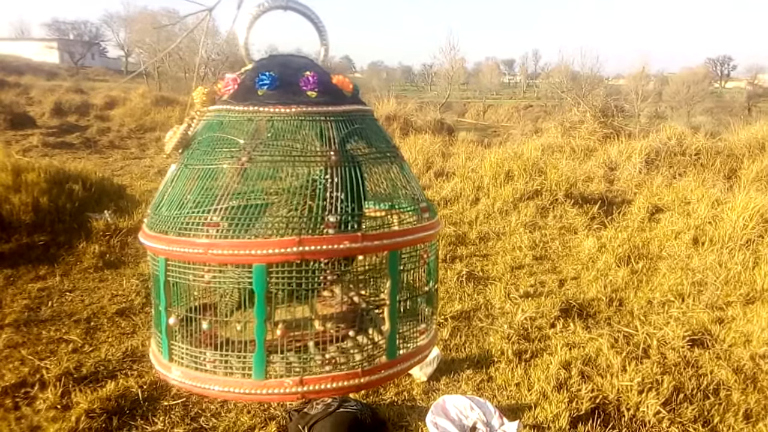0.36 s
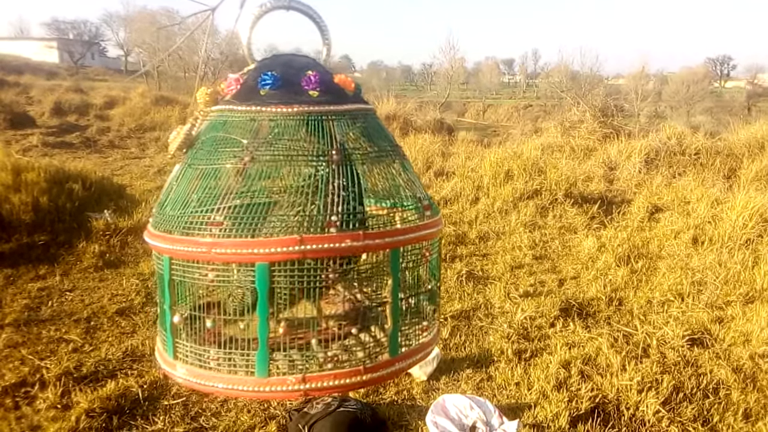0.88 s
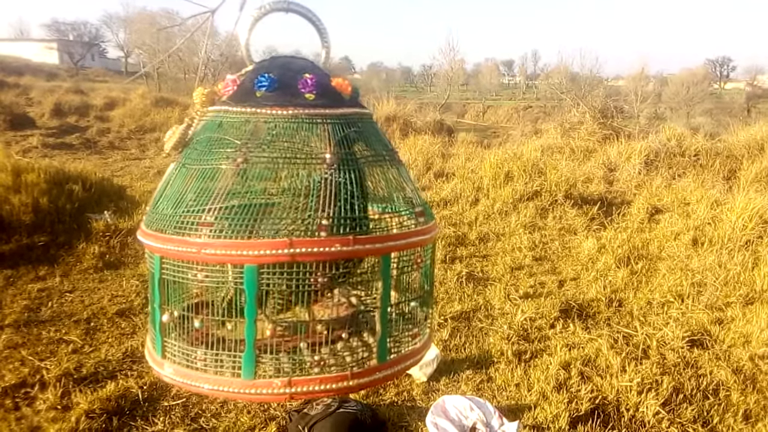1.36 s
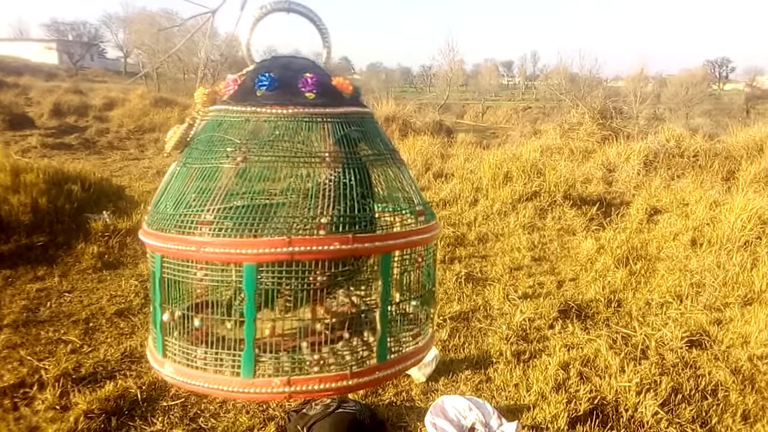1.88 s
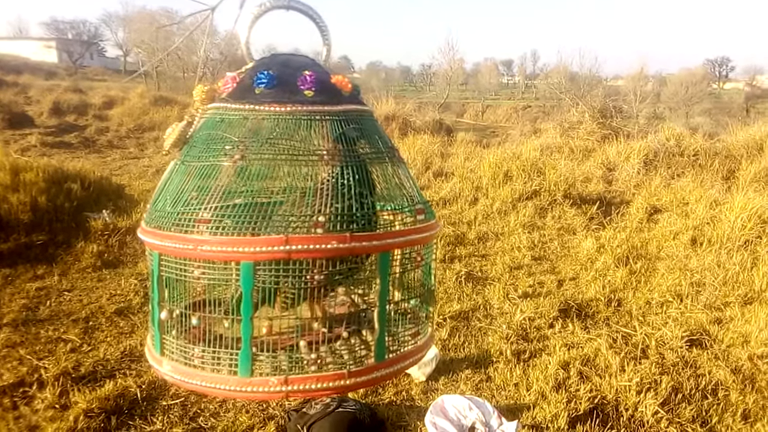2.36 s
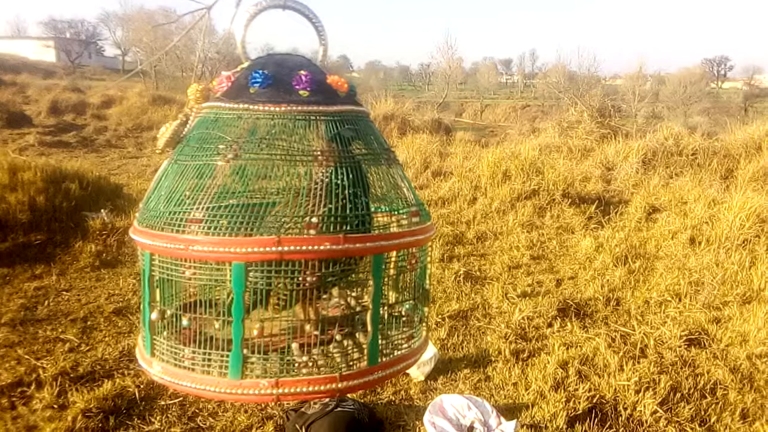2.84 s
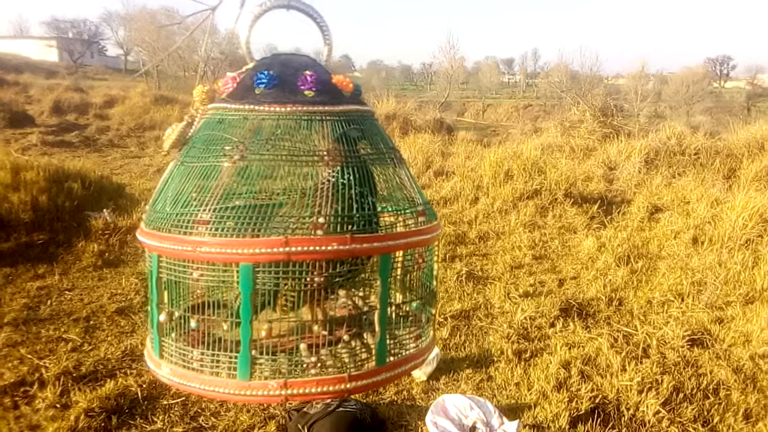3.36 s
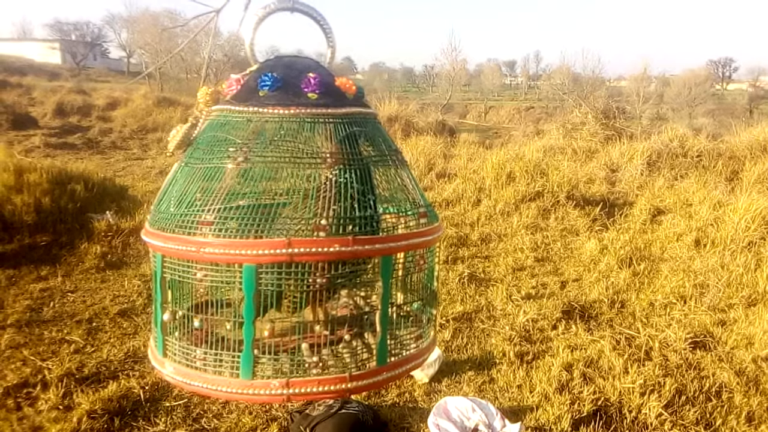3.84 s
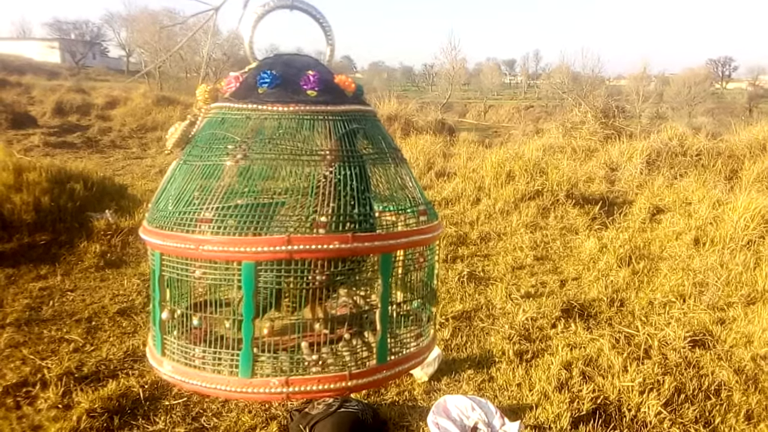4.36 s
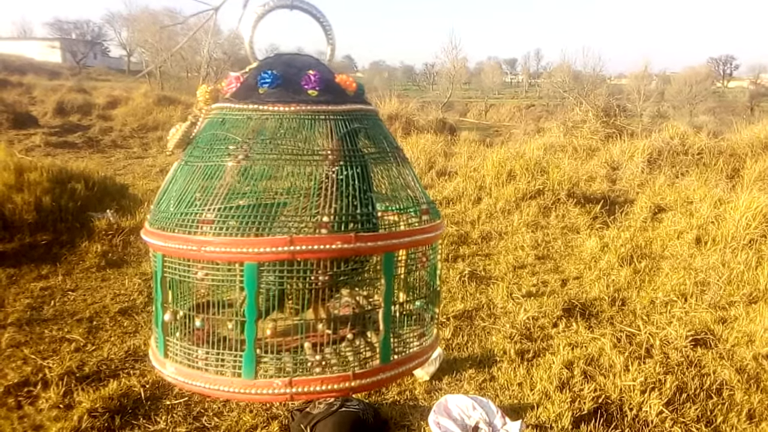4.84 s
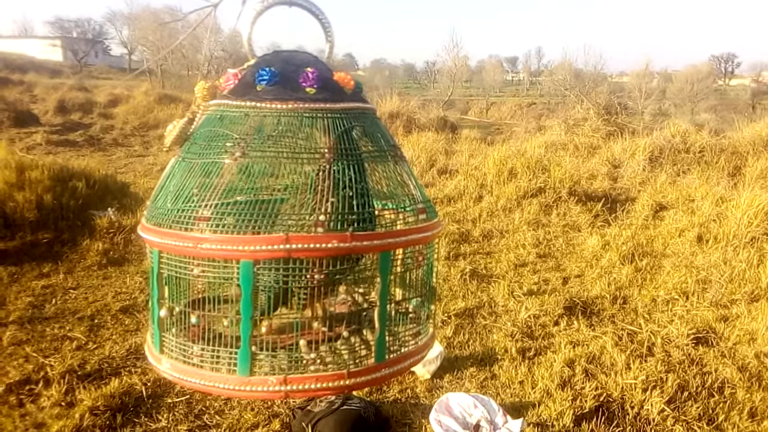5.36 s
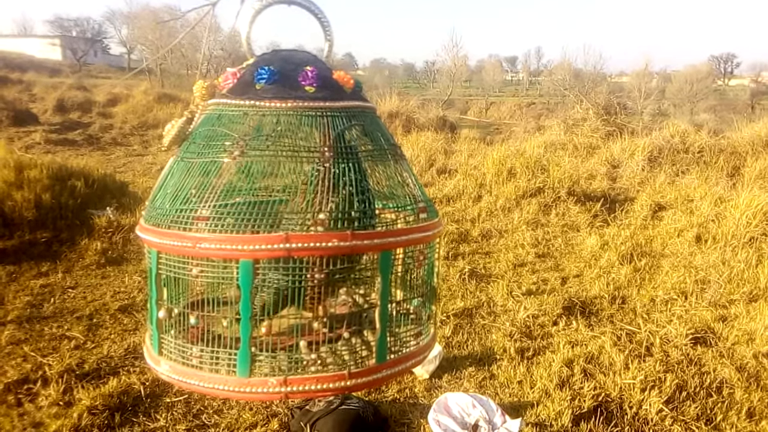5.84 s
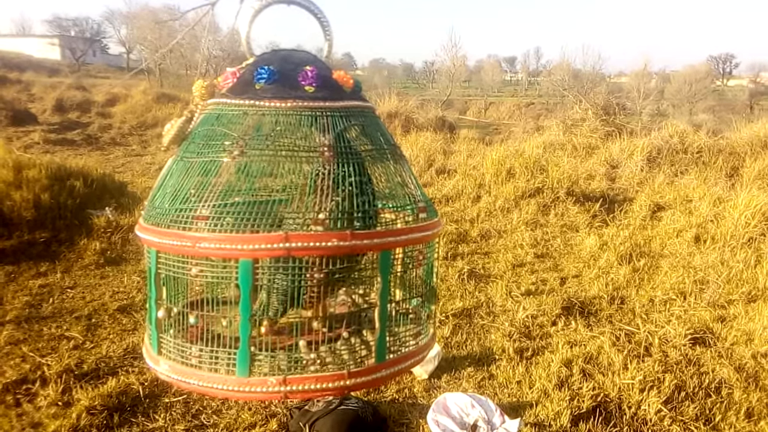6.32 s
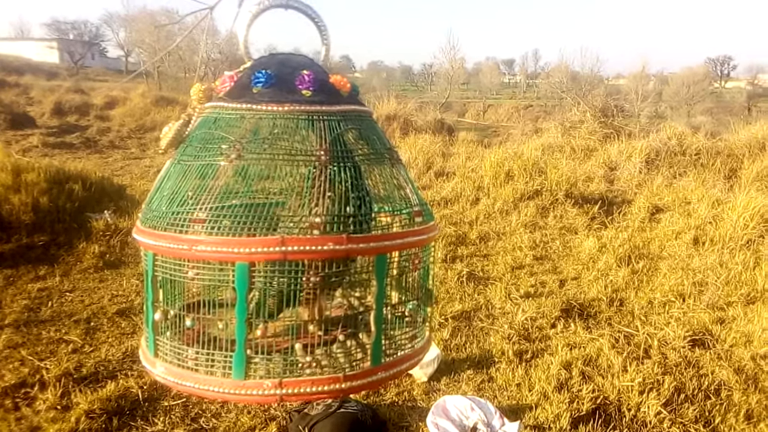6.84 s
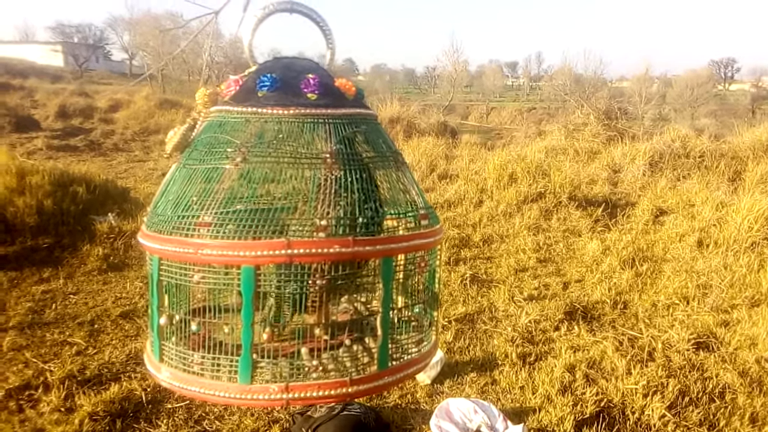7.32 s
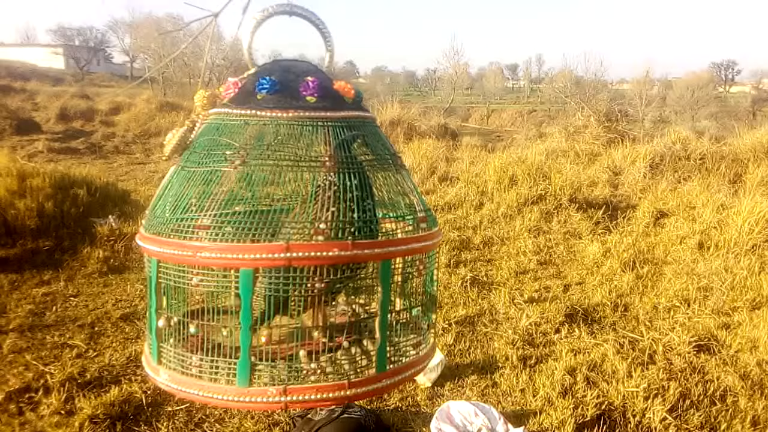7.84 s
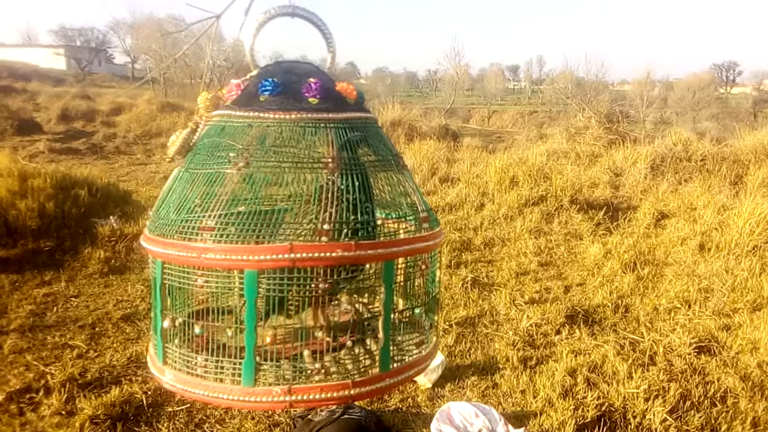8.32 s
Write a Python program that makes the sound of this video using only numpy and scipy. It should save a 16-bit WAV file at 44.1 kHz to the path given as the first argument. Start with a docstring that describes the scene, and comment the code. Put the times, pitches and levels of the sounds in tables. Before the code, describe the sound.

Open dry farmland, very quiet, with low gusty wind, faint flickering hiss and sparse far birds. Close to a phone microphone, a caged game bird makes one quick cluck with a plunging whistle, pauses long, then gives a piercing whistled chip and four raspy, metallic buzzes in quick succession, two of them cracking briefly into clear whistle. A light scattered echo fades behind, leaving the field.

```python
"""A caged partridge-like bird calls a metre from a phone in open farmland: buzzing notes, whistles, clucks and pops.
The buzz is one tone that flips between a low and a high pitch, mostly 200 to 300 times a second, coloured by the
windpipe. Whistles are smooth tones, clucks are low pulses with breath, and pops are short damped rings.
Tree lines and walls return thin echoes, made of fading noise. Far songbirds, a dove and hoarse crow-like sounds
are gliding tones; wind rumble and a flickering hiss are filtered noise."""
import sys
import numpy as np
from scipy import signal
from scipy.fft import rfft, irfft
from scipy.io import wavfile
from scipy.ndimage import uniform_filter1d, minimum_filter1d

SR = 44100
rng = np.random.default_rng(int(sys.argv[2]) if len(sys.argv) > 2 else 0)


def makeup_ratio(level_db):
    """Linear amplitude ratio for a level in decibels (20 dB per factor of ten)."""
    decades = np.asarray(level_db, float) / 20
    return 10 ** decades


def put_to_file(sound):
    """Save the sound as 16-bit audio at rate SR, in the file named by the first command-line argument."""
    columns = np.atleast_2d(sound).T  # one column per channel
    safe = np.clip(columns, -1, 1)
    whole_steps = np.round(safe * 32767)
    wavfile.write(sys.argv[1], SR, whole_steps.astype(np.int16))


N = 372644  # length in samples
T = np.arange(N) / SR  # time in seconds


def colour(x, points):
    """Filter a sound with the gain drawn by (Hz, dB) points, without ringing ahead of time."""
    hz, db = np.transpose(points)
    size = 4096
    bins = np.fft.rfftfreq(size, 1 / SR)
    log_gain = np.log(makeup_ratio(np.interp(np.log(bins + 1), np.log(hz), db)))
    # folding the cepstrum forward gives a minimum-phase filter
    cepstrum = irfft(log_gain)
    cepstrum = np.r_[cepstrum[0], 2 * cepstrum[1:size // 2], np.zeros(size // 2)]
    return signal.fftconvolve(x, irfft(np.exp(rfft(cepstrum))))[:len(x)]


def unit(x):
    """Scale to rms 1."""
    return x / np.sqrt(np.mean(x ** 2))


def coloured_noise(points):
    """Noise of rms 1 with the given tone colour."""
    return unit(colour(rng.standard_normal(N), points))


def walk(rate, count=N):
    """Smooth random wander, spread near 1, about rate new values a second."""
    k = max(int(SR / rate), 1)
    smooth = uniform_filter1d(uniform_filter1d(rng.standard_normal(count), k), k)
    return np.sqrt(1.8 * k) * smooth


def tone(hz, multiples, db):
    """Partials of one oscillator whose pitch moves every sample."""
    phase = 2 * np.pi * np.cumsum(hz) / SR
    return np.sqrt(2) * sum(makeup_ratio(d) * np.sin(m * phase) for m, d in zip(multiples, db))


def clock(start, length):
    """Sample range of a note and the seconds since its start."""
    span = slice(int(start * SR), int((start + length) * SR))
    return span, T[span] - start


EDGE_DB = -29.5  # level at the very edges of a note, against its middle


def edges(t, length, attack, release):
    """Attack, hold and release of a note in dB."""
    fade_in = np.clip(1 - t / attack, 0, 1)
    fade_out = np.clip(1 - (length - t) / release, 0, 1) ** 2
    return EDGE_DB * (fade_in + fade_out)


# The buzzing notes. Each row: start in seconds, length in seconds, attack in seconds, level in dB before colouring.
BUZZ_NOTES = [(6.267, .18, 0.0018, -13), (6.604, .217, 0.019, -12.5), (7.113, .11, 0.0058, -13),
              (7.276, .196, .01, -13)]
# How the membranes flutter. Each row: time in seconds, flips per second, unevenness from 0 to 1.
FLUTTER_PATH = [(6.27, 281, .05), (6.37, 285, .07), (6.43, 236, .3), (6.62, 258, .4), (6.65, 265, .1),
                (6.71, 305, .2), (6.745, 195, .5), (6.8, 290, .2), (7.12, 270, .3), (7.165, 260, .08),
                (7.21, 280, .4), (7.285, 255, .4), (7.335, 260, .1), (7.375, 284, .07), (7.43, 265, .1),
                (7.46, 236, .4)]
# Loudness of the buzz's first three partials, in dB before colouring.
BUZZ_PARTIALS_DB = [-0.5, -7.5, -22]
# Windpipe and microphone with the beak open. Each row: frequency in Hz, gain in dB.
OPEN_BEAK = [(700, -64), (1500, -16), (2350, -22), (2750, 4), (3200, 2), (3700, -1), (4700, 2.5), (5400, 1),
             (5900, -8), (6600, 3), (7600, -15), (9000, -18.5), (10500, -26), (11800, -21.5),
             (13500, -28.5), (15200, -27)]


def buzz():
    """The membranes flip between two pitches and falter at each flip; breath leaks through the same windpipe."""
    taut_low_hz, taut_high_hz = 2820, 5450  # the two pitches in mid note
    slack_low_hz, slack_high_hz = 2545, 4446  # and where the note begins or dies
    slack_s, release_s = 0.027, 0.02256  # time to tighten, time to fade
    sag_db_s = -10.5  # air runs out
    breath_db, slack_breath_db = -14, 6  # against the tone; more air leaks while slack
    squareness, dip = 1.8, .6  # how abrupt each flip is, how deeply it falters
    waver, shimmer_db = .016, 1.0  # random pitch share, random level
    mute_s = .004  # the buzz sinks over this time as a whistle breaks in
    tighten, tighten_s = .09, .02  # share the low pitch climbs toward a break; it comes down after it
    voiced, breath = np.zeros(N), np.zeros(N)
    at, rate, roughness = np.transpose(FLUTTER_PATH)
    for start, length, attack, db in BUZZ_NOTES:
        span, t = clock(start, length)
        count = len(t)
        slack = np.exp(-t / slack_s) + np.exp((t - length + release_s / 2) / slack_s)
        slack = np.minimum(slack, 1)
        low = taut_low_hz + (slack_low_hz - taut_low_hz) * slack
        high = taut_high_hz + (slack_high_hz - taut_high_hz) * slack
        level = db + sag_db_s * t + edges(t, length, attack, release_s)
        for break_start, lasts, _, _ in WHISTLE_BREAKS:
            # seconds inside the break, negative outside it
            inside = np.minimum(T[span] - break_start, break_start + lasts - T[span])
            level += EDGE_DB * np.clip(inside / mute_s, 0, 1)
            low = low * (1 + tighten * np.exp(np.minimum(inside, 0) / tighten_s))
        flips = np.interp(T[span], at, rate)
        uneven = np.interp(T[span], at, roughness)
        turn = 2 * np.pi * np.cumsum(flips * (1 + uneven * walk(350, count))) / SR
        # -1 is the low pitch, +1 the high one
        side = np.tanh(squareness * np.sin(turn)) / np.tanh(squareness)
        hz = low + (high - low) * (1 + side) / 2
        hz = hz * (1 + waver * walk(624, count))
        # the wider the jump, the deeper the falter
        falter = 1 - dip * np.log2(high / low) * (1 - side ** 2)
        loudness = makeup_ratio(level + shimmer_db * walk(500, count))
        voiced[span] = tone(hz, [1, 2, 3], BUZZ_PARTIALS_DB) * falter * loudness
        breath[span] = makeup_ratio(level + breath_db + slack_breath_db * slack) * (1 - side / 2)
    return colour(voiced, OPEN_BEAK) + breath * coloured_noise(OPEN_BEAK)


# Free whistles. Each row: start in seconds, length in seconds, top pitch in Hz, last pitch in Hz
# (both before the slide and arch), level in dB.
FREE_WHISTLES = [(.6935, .0265, 5960, 3900, -10.5), (5.746, .0185, 3620, 1650, -12),
                 (5.7878, .04, 6630, 2500, -8)]
# A buzz breaks into a steady whistle with a strong undertone.
# Each row: start in seconds, length in seconds, top pitch in Hz, level in dB.
WHISTLE_BREAKS = [(6.765, .028, 6170, -13), (7.35, 0.023, 6310, -16.5)]
# Overtones in dB: the octave of the tone, then the third partial of the undertone (against the undertone).
WHISTLE_PARTIALS_DB = [-22.5, -21.5]
# The windpipe has notches that the tone slides through. Each row: pitch in Hz, gain in dB.
WHISTLE_GAIN = [(2600, -1), (3500, -13), (4600, -1), (5300, -4), (5700, 0), (5950, -16), (6300, -4),
                (6500, 0)]


def whistle_note(hz, level, under_db, breath):
    """A clean tone, with an undertone that makes every other cycle stronger, over a little breath."""
    breath_db, shimmer_db = -28, .7
    octave_db, third_db = WHISTLE_PARTIALS_DB
    main = tone(hz, [1], [np.interp(hz, *np.transpose(WHISTLE_GAIN))])
    # the octave fades when the membrane slackens
    octave = tone(hz, [2], [octave_db]) * (hz / hz.max()) ** 8
    undertone = makeup_ratio(under_db) * tone(hz, [.5, 3 / 2], [0, third_db])
    loudness = makeup_ratio(level + shimmer_db * walk(400, len(hz)))
    return (main + octave + undertone + makeup_ratio(breath_db) * breath) * loudness


def whistle():
    """A steady membrane sings: free whistles slide up, arch and plunge, while breaks in a buzz only arch."""
    scoop, scoop_s, bow = .3, .0017, .035  # pitch shares: slide up into a free whistle, arch over its length
    drop_before_s, drop_hz_s = .0045, 4.2  # plunge: centre before the end; the deeper, the quicker (Hz x s)
    attack_drops, release_drops = 1.5, 5  # edges last this many plunge times
    sag_db_s = -150  # air runs out
    out, breath = np.zeros(N), coloured_noise(OPEN_BEAK)
    for start, length, top, last, db in FREE_WHISTLES:
        span, t = clock(start, length)
        drop_s = drop_hz_s / (top - last)
        arch = bow * (2 * t / length - 1) ** 2
        hz = top * (1 - arch - scoop * np.exp(-t / scoop_s))
        hz -= (top - last) / (1 + np.exp((length - drop_before_s - t) / drop_s))
        level = db + sag_db_s * t + edges(t, length, attack_drops * drop_s, release_drops * drop_s)
        out[span] = whistle_note(hz, level, -32, breath[span])
    for start, length, top, db in WHISTLE_BREAKS:
        span, t = clock(start, length)
        hz = top * (1 - bow * (2 * t / length - 1) ** 2)
        level = db + edges(t, length, .004, .002)
        out[span] = whistle_note(hz, level, -11, breath[span])
    return out


# Clucks that open a note and rise. Each row: peak time in seconds, pulse rate in Hz at the peak, voice level in dB,
# breath level in dB, fade in seconds; levels are before the falling partials and the colouring of the voice.
OPENING_CLUCKS = [(.679, 1125, -24.5, -24.5, 0.021), (.696, 1312, -19.5, -23.5, 0.007),
                  (.724, 1460, -36.5, -37.5, 0.02), (5.756, 1774, -20, -27.5, .028),
                  (5.79, 1580, -42, -24, 0.0034), (6.605, 1173, -34.5, -26.5, 0.076),
                  (7.104, 1177, -24, -17, 0.039), (7.282, 1210, -17, -20.5, 0.0071)]
# Clucks that close a note and sink. Each row: the same columns.
CLOSING_CLUCKS = [(.773, 850, -22, -33, 0.022), (5.767, 1570, -15.5, -30.5, .022),
                  (5.827, 1550, -27.5, -28, 0.014), (6.432, 1238, -45, -32, 0.017),
                  (6.812, 1135, -29.5, -24.5, .016), (7.208, 1182, -29, -30.5, 0.0091),
                  (7.466, 1075, -29, -30.5, 0.013)]
# Windpipe and microphone with the beak nearly shut. Each row: frequency in Hz, gain in dB.
SHUT_BEAK = [(450, -57.5), (800, -14.5), (1500, -4.5), (2100, -7.5), (2900, 3.5), (3800, -9.5), (4700, 2),
             (5800, -12), (6800, -9), (8000, -21.5), (11000, -25), (13000, -34.5), (15200, -27.5)]


def cluck():
    """Low pulses and breath ring the longer, nearly closed windpipe."""
    # rise in s, glide in Hz per s, roundness of the peak
    opening_shape, closing_shape = (.005, 12000, 1.0), (.01, -8000, 2.0)
    breath_lingers = 1.8  # fade of the breath against that of the voice
    jitter, fall_db = .025, -1.2  # random pitch share, level change per partial
    voiced, breath = np.zeros(N), np.zeros(N)
    orders = np.arange(1, 11)

    def under_peak(t, rise, fall, roundness):
        """Level against the peak: rise and fall are the times to 40 dB under it."""
        return -40 * np.where(t < 0, -t / rise, t / fall) ** roundness

    for table, shape in ((OPENING_CLUCKS, opening_shape), (CLOSING_CLUCKS, closing_shape)):
        rise, glide, roundness = shape
        for peak, rate_hz, db, breath_db, fade in table:
            breath_fade = breath_lingers * fade
            span, t = clock(peak - rise, rise + breath_fade)
            t = t - rise  # zero at the peak
            hz = (rate_hz + glide * t) * (1 + jitter * walk(400, len(t)))
            voice_level = makeup_ratio(db + under_peak(t, rise, fade, roundness))
            voiced[span] += tone(hz, orders, fall_db * orders) * voice_level
            breath[span] += makeup_ratio(breath_db + under_peak(t, rise, breath_fade, roundness))
    return colour(voiced, SHUT_BEAK) + breath * coloured_noise(SHUT_BEAK)


# Pops as the windpipe snaps open. Each row: start in seconds, pitch in Hz, starting level of the decay in dB,
# time in seconds to die by 60 dB.
POP_RINGS = [(.6775, 1240, -11, .02), (.6935, 1510, -23, .024), (.7241, 1393, -34.5, .032),
             (6.2652, 5300, -7, .045), (6.603, 1260, -27, .013), (6.79, 2930, -9, .0077),
             (7.102, 1156, -19, .024), (7.281, 1275, -28.5, .04), (7.371, 4370, -5, .008)]


def pops():
    """Each pop is one short damped ring."""
    out, t = np.zeros(N), T[:int(.06 * SR)]
    for start, hz, db, t60 in POP_RINGS:
        k = int(start * SR)
        onset = np.minimum(t / .0008, 1)
        out[k:k + len(t)] += makeup_ratio(db - 60 * t / t60) * np.sin(2 * np.pi * hz * t) * onset
    return out


# A dove. Each row: start in seconds, length in seconds, level in dB.
DOVE_NOTES = [(.951, 0.082, -60), (1.536, 0.084, -54.5), (1.914, 0.075, -53), (2.034, 0.052, -65)]
# The dove's glide: start, middle and end pitch in Hz.
DOVE_GLIDE = (650, 715, 710)
# A sparrow's chirps. Each row: start in seconds, level in dB.
SPARROW_CHIRPS = [(2.17, -61), (3.474, -60), (4.456, -62)]
# The arch and the level tail of one chirp. Each row: delay after the start in seconds, length in seconds,
# start, middle and end pitch in Hz, level against the chirp in dB.
CHIRP_PARTS = [(0, .048, 4210, 5350, 3900, -0.59), (0.047, 0.052, 4190, 4050, 4390, -0.21)]
# Clear songbird notes. Each row: start in seconds, length in seconds, start pitch in Hz, end pitch in Hz, level in dB.
SONG_NOTES = [(0, .036, 2950, 2200, -61), (0, 0.03, 3138, 3260, -58.5), (.02, 0.036, 4750, 3850, -64.5),
              (.035, 0.067, 1900, 1650, -66.5), (.065, 0.027, 4050, 4050, -63.5),
              (.08, 0.05, 3320, 2750, -70.5), (.457, .064, 3060, 3000, -72), (1.65, .12, 2830, 2740, -71),
              (2.18, .07, 3030, 3420, -63.5), (2.26, 0.13, 2690, 2780, -66),
              (2.418, 0.077, 3080, 3280, -61.5), (3.0, .07, 2400, 2240, -68), (3.1, 0.077, 3020, 2930, -64),
              (3.26, .03, 3780, 3680, -71), (3.76, .05, 2950, 3130, -64.5), (4.34, .07, 3380, 2980, -71.5),
              (4.42, .06, 2640, 2500, -73), (4.76, 0.037, 2920, 3170, -62), (4.8, 0.062, 4420, 4350, -67),
              (4.87, .07, 4000, 2850, -70), (5.15, 0.11, 3650, 3130, -69.5), (5.5, .12, 3700, 2910, -66),
              (6.04, 0.059, 4400, 4350, -67.5), (6.11, 0.06, 3830, 3200, -64),
              (6.14, 0.045, 2550, 2000, -74), (7.991, 0.14, 3720, 3720, -70), (8.16, .087, 3320, 3220, -72),
              (8.2, 0.28, 3700, 3700, -66), (8.23, 0.042, 2755, 2630, -64.5), (8.3, 0.14, 6500, 6430, -75)]
# Hoarse far sounds: crow-like calls, rough sweeps and a low rustle. Each row: the same columns.
HOARSE_SOUNDS = [(.33, .19, 273, 340, -69.5), (1.901, .083, 4770, 4850, -69.5), (2.2, .15, 1660, 1570, -75),
                 (2.596, .2, 1540, 1525, -74), (2.67, 0.056, 5690, 2840, -61.5),
                 (3.17, .12, 1570, 1520, -75), (3.42, .12, 3090, 2700, -68.5),
                 (3.46, .027, 1530, 1535, -64.5), (3.813, .09, 5630, 5300, -70),
                 (4.28, .28, 1570, 1620, -75), (4.348, .16, 1072, 1160, -75),
                 (5.163, .07, 1565, 1540, -69.5), (5.45, .22, 1400, 1390, -70.5),
                 (5.454, .23, 1823, 1780, -67.5), (5.896, .22, 1520, 1325, -67),
                 (5.911, .15, 1032, 960, -70), (7.847, .032, 1573, 1510, -61.5),
                 (8.4, .034, 1610, 1530, -62.5)]


def far_birds():
    """Single gliding tones; hoarse ones scatter more in pitch and level."""
    dove_hoarse, song_hoarse, rough_hoarse = .08, .07, .4
    arch = 0.021  # the middle of a song note or hoarse sound lies this share above the mean of its ends
    notes = [(start, length, *DOVE_GLIDE, db, dove_hoarse) for start, length, db in DOVE_NOTES]
    for start, db in SPARROW_CHIRPS:
        for after, *shape, less in CHIRP_PARTS:
            notes.append((start + after, *shape, db + less, song_hoarse))
    for table, hoarse in ((SONG_NOTES, song_hoarse), (HOARSE_SOUNDS, rough_hoarse)):
        for start, length, first, last, db in table:
            middle = (1 + arch) * (first + last) / 2
            notes.append((start, length, first, middle, last, db, hoarse))
    out = np.zeros(N)
    for start, length, start_hz, middle_hz, end_hz, db, hoarse in notes:
        u = np.linspace(0, 1, int(length * SR))
        # a smooth curve through the three pitches
        hz = start_hz * (1 - u) * (1 - 2 * u) + 4 * middle_hz * u * (1 - u) + end_hz * u * (2 * u - 1)
        hz = hz * (1 + .14 * hoarse * walk(960, len(u)))
        swell = np.sin(np.pi * u) ** .6
        note = tone(hz, [1], [db]) * swell * makeup_ratio((2 + hoarse) * walk(300, len(u)))
        k = int(start * SR)
        out[k:k + len(u)] += note[:N - k]
    return out


def echo(x, t60, db, rise, late=0.):
    """Diffuse return from scattered surfaces: noise that builds up and dies away; late s of travel come first."""
    t = np.arange(int(1.5 * SR)) / SR
    tail = rng.standard_normal(len(t)) * makeup_ratio(-60 * t / t60) * (1 - np.exp(-(t / rise) ** 2))
    tail = makeup_ratio(db) * tail / np.sqrt(np.sum(tail ** 2))
    tail = np.r_[np.zeros(int(late * SR)), tail]
    return signal.oaconvolve(x, tail)[:N]


# Wind strength. Each row: time in seconds, rumble level in dB before its flicker.
WIND_GUSTS = [(0, -63.5), (.6, -57), (1.0, -59.5), (1.33, -62), (1.8, -62), (2.5, -60.5), (3.05, -67.5),
              (3.6, -61.5), (4.1, -63), (4.35, -57), (4.78, -63), (5.0, -61.5), (5.3, -63), (5.65, -61),
              (6.55, -57), (7.5, -58), (7.9, -53), (8.2, -62)]
# Colour of the wind rumble. Each row: frequency in Hz, relative level in dB per Hz.
RUMBLE_COLOUR = [(30, -49), (55, -9.5), (70, 1), (120, 4), (200, -10), (330, -26.5), (500, -51)]
# Colour of the deepest rumble. Each row: the same columns.
DEEP_COLOUR = [(12, -30.5), (25, -13.5), (45, 1), (60, -0.5), (90, -38)]


def wind():
    """Gusty low rumble over a still deeper one that swells late."""
    rumble_db = np.interp(T, *np.transpose(WIND_GUSTS)) + 3.5 * walk(9.1)
    rumble = coloured_noise(RUMBLE_COLOUR) * makeup_ratio(rumble_db)
    start_db, swell_db, swell_at_s = -80.5, 9.5, 4.95
    deep_db = start_db + swell_db / (1 + np.exp((swell_at_s - T) / .15)) + 3.0 * walk(3)
    return rumble + coloured_noise(DEEP_COLOUR) * makeup_ratio(deep_db)


# Colour of the hiss. Each row: frequency in Hz, relative level in dB per Hz.
HISS_COLOUR = [(120, -50.5), (250, -2.5), (430, -6.5), (800, -10), (1300, -13.5), (1800, -15),
               (3000, -14.5), (5000, -14.5), (6700, -17.5), (7300, -25), (9000, -40.5), (14000, -38),
               (15000, -16.5), (15800, -13.5)]


def hiss():
    """Fine hiss whose narrow bands flicker at random in short streaks."""
    cells = signal.stft(rng.standard_normal(N + 1024), nperseg=512)[2]
    # narrow streaks: about 170 Hz wide and 60 ms long
    streaks = uniform_filter1d(rng.standard_normal(cells.shape), size=10, axis=1)
    streaks = uniform_filter1d(streaks, size=2, axis=0)
    streaky = signal.istft(cells * makeup_ratio(3.0 * unit(streaks)))[1][:N]
    return unit(colour(streaky, HISS_COLOUR)) * makeup_ratio(-65.5)


# Colour of the far echoes. Each row: frequency in Hz, gain in dB.
ECHO_COLOUR = [(500, -2.5), (1500, 5.5), (2200, 1.5), (3000, -4), (3800, 6.5), (5000, -3), (6500, -0.5),
               (7600, -17), (9500, -21.5), (12000, -40)]
# Notches and lift of the microphone port. Each row: frequency in Hz, gain in dB.
PORT_COLOUR = [(7000, 0), (9300, 0.5), (10000, -8), (11000, 3.5), (12300, -0.5), (12900, -9.5),
               (14000, -4.5), (15000, 10), (16000, -4)]


def scene():
    """Bird, cage and bushes close by, tree lines and a row of walls far off, the field around."""
    bird = buzz() + whistle() + cluck() + pops()
    others = far_birds()
    near = echo(bird, .12, -28, .003)
    # the first call is aimed low and reaches the trees and walls less
    sent = bird * makeup_ratio(np.where(T < 1, -10.5, 0))
    # moving air and leaves make the far return flutter
    trees = echo(sent, 1.3, -30.5, .012) * makeup_ratio(2.5 * walk(40))
    trees = trees + echo(others, .65, -6.5, .018)
    walls = echo(sent, .5, -49, .02, late=.96)
    close = colour(bird + near, PORT_COLOUR)
    far = others + colour(trees + walls, ECHO_COLOUR)
    return (close + far + wind() + hiss())[None]


def top_cut(x):
    """Nothing passes above the cut-off."""
    return signal.sosfilt(signal.butter(12, 16820, fs=SR, output="sos"), x)


def record(dry):
    """The phone rounds the peaks, turns the bass band down while the sound is loud and cuts the top."""
    duck_db, knee_db = -14, -36  # limit of the bass cut; peak level where half the cut acts
    deep_hz, split_hz, top_hz = 60., 1100.0, 15900  # edges of the bass band, top of the sound
    x = 1.2 * np.tanh(dry[0] / 1.2)
    # highest peak in a sliding window, then smoothed
    peaks = -minimum_filter1d(-np.abs(x), int(0.014 * SR))
    loud = uniform_filter1d(peaks, int(0.011 * SR))
    band = signal.butter(2, [deep_hz, split_hz], "band", fs=SR, output="sos")
    bass = signal.sosfiltfilt(band, x)
    x = x - bass * (1 - makeup_ratio(duck_db)) * loud / (loud + makeup_ratio(knee_db))
    x = signal.sosfilt(signal.ellip(10, .2, 80, top_hz, fs=SR, output="sos"), x)
    return top_cut(x[None])


dry = scene()
out = record(dry)
put_to_file(out)
```